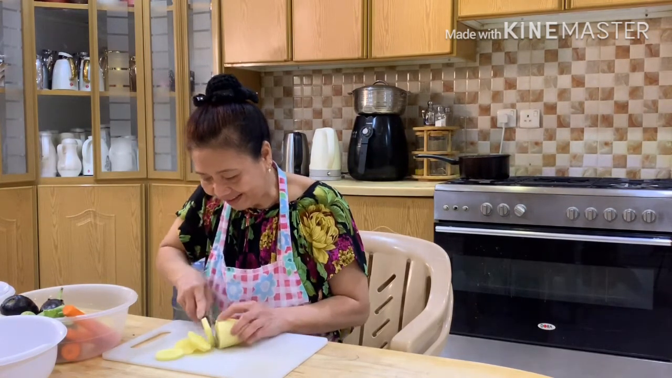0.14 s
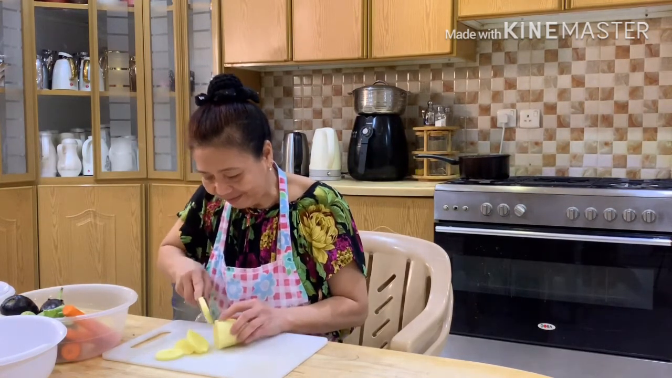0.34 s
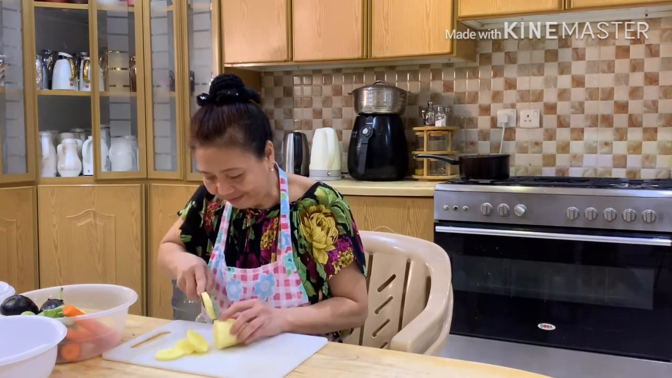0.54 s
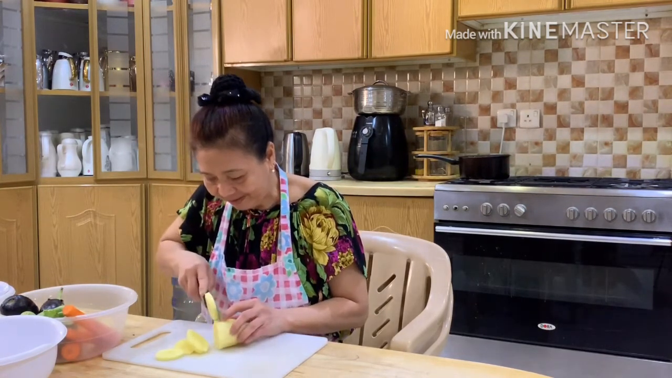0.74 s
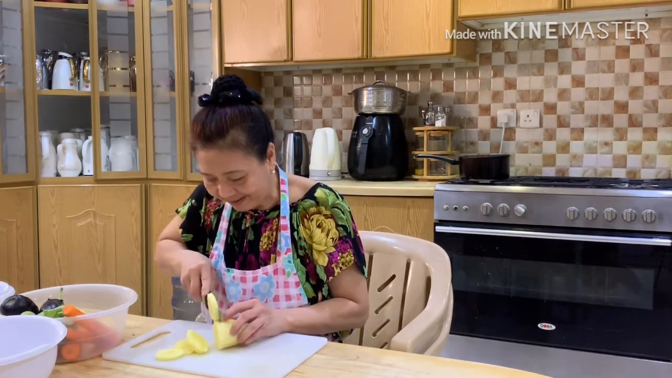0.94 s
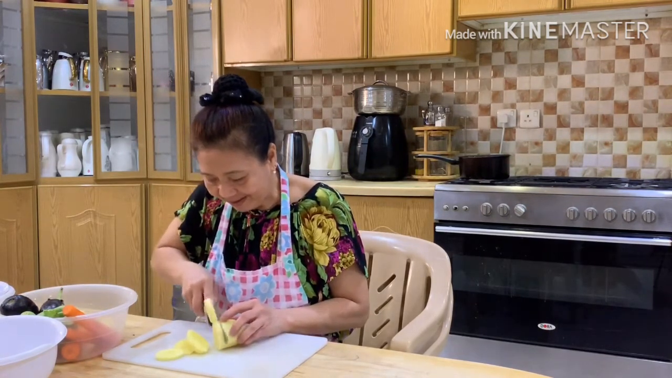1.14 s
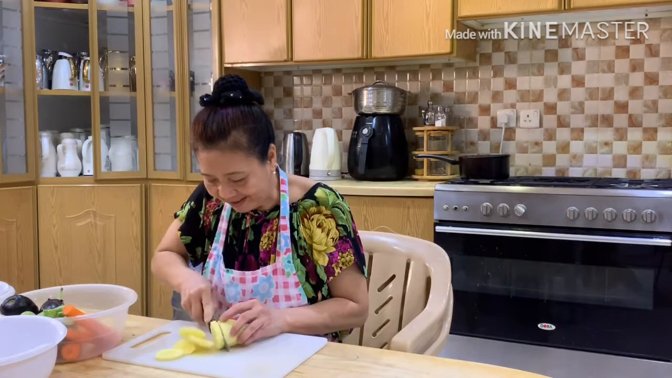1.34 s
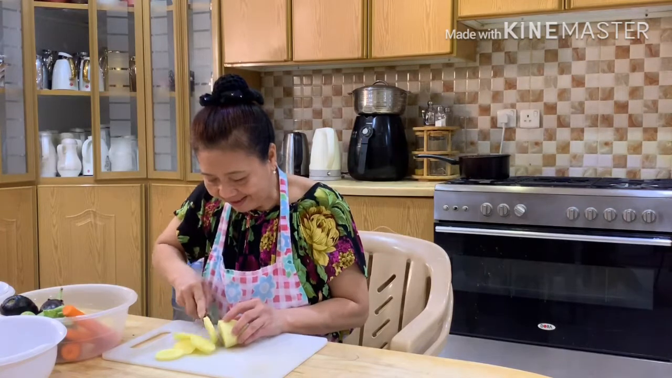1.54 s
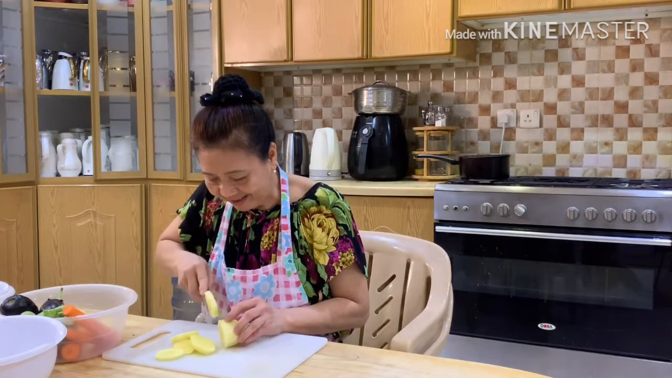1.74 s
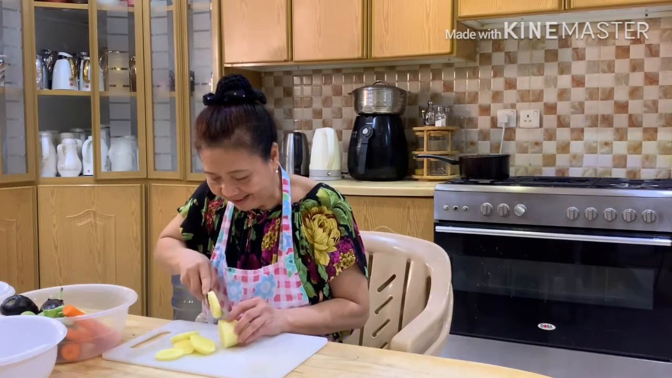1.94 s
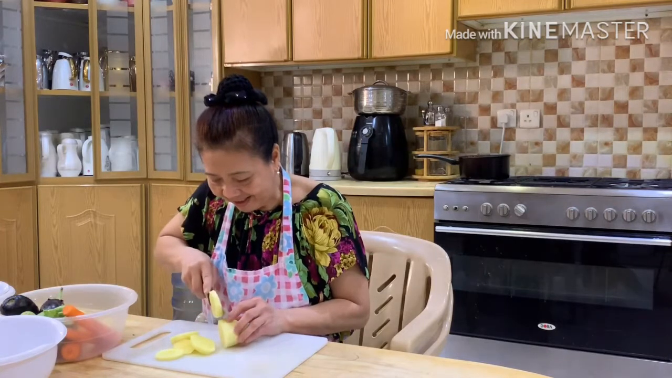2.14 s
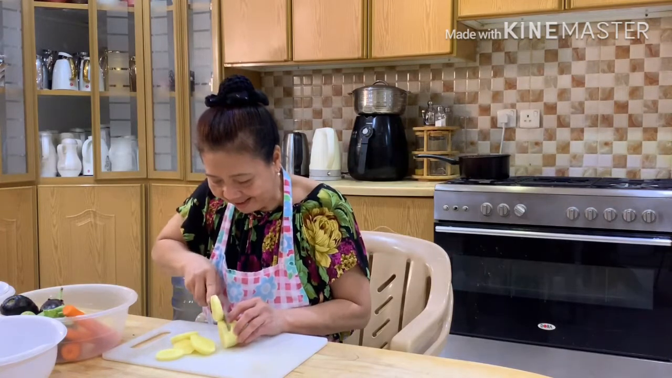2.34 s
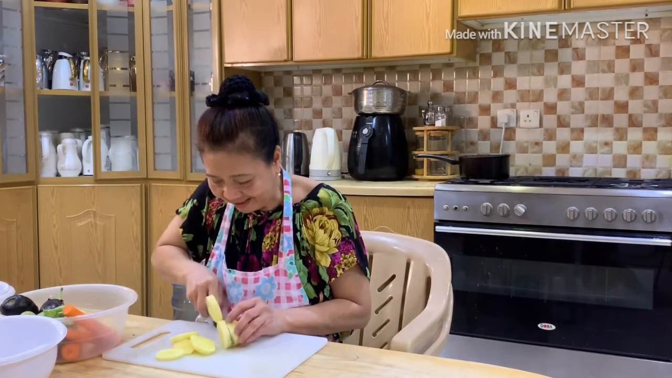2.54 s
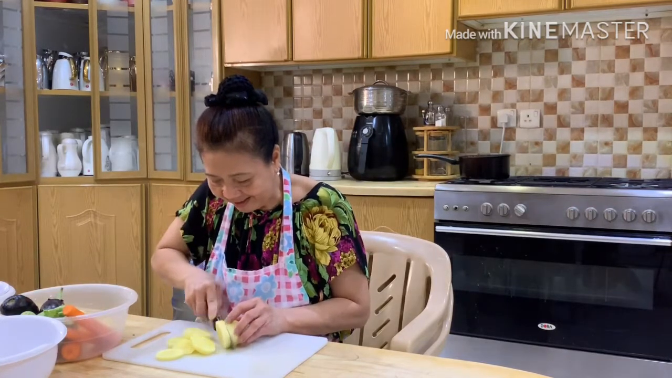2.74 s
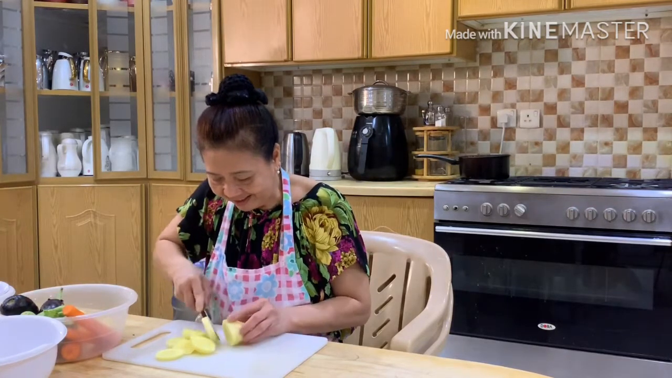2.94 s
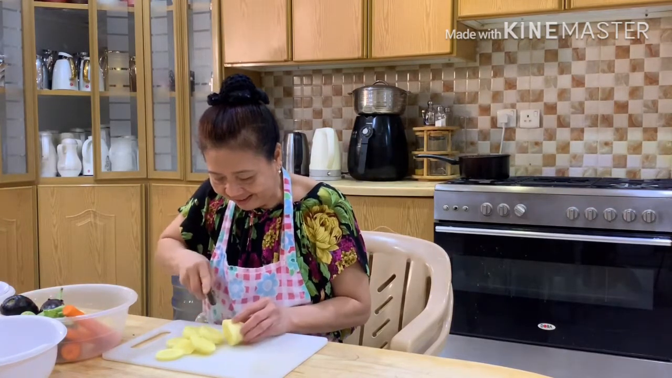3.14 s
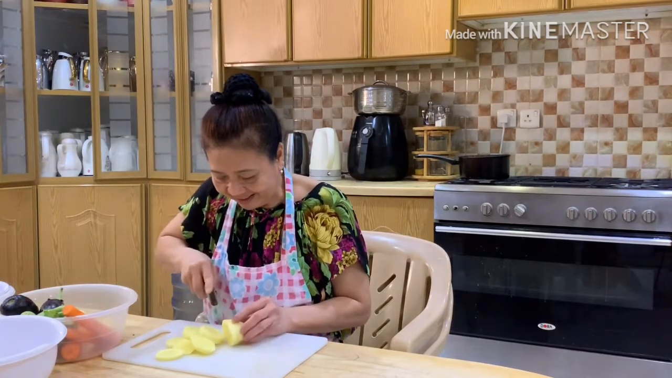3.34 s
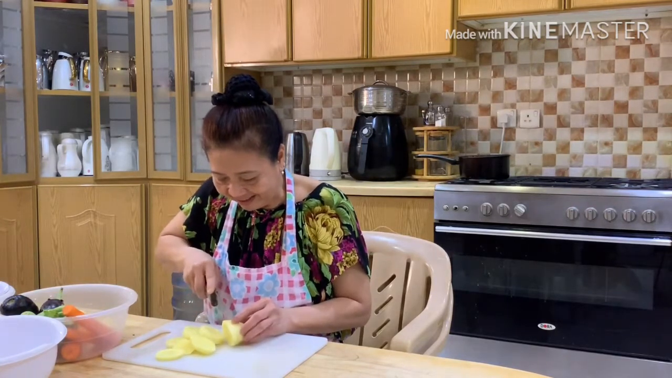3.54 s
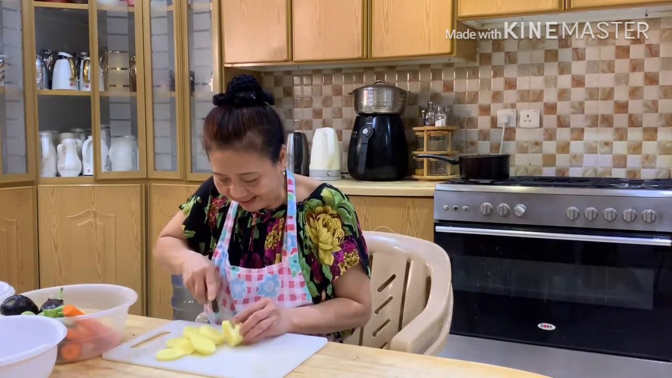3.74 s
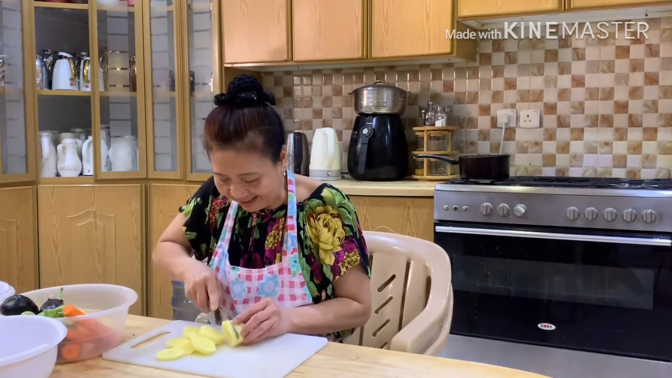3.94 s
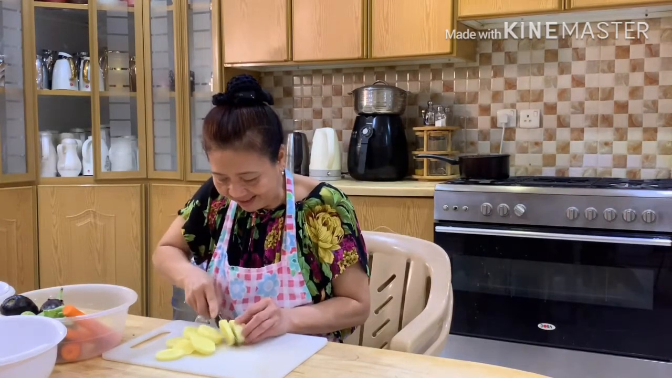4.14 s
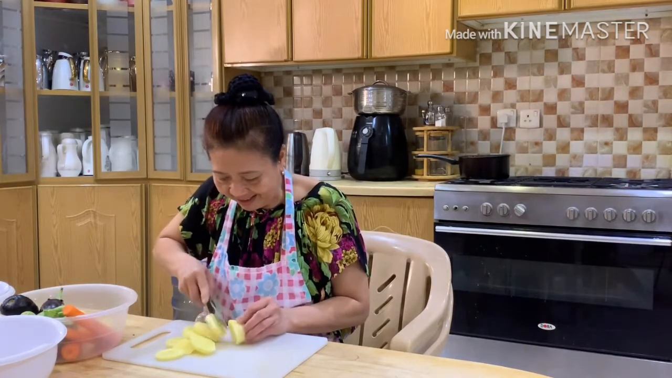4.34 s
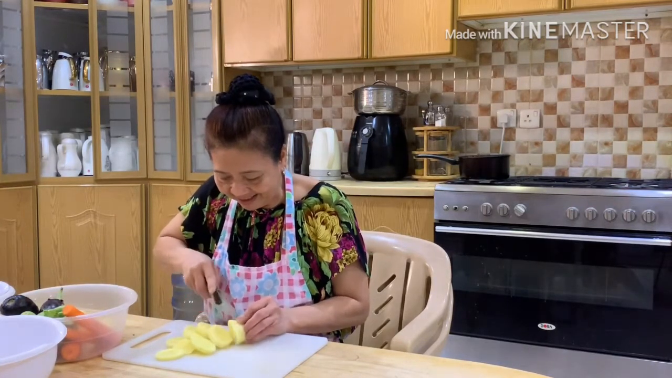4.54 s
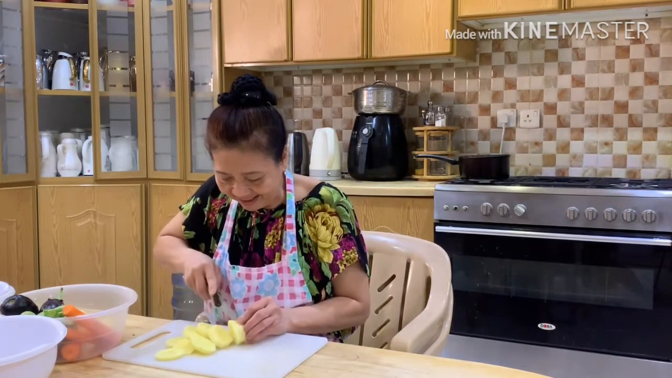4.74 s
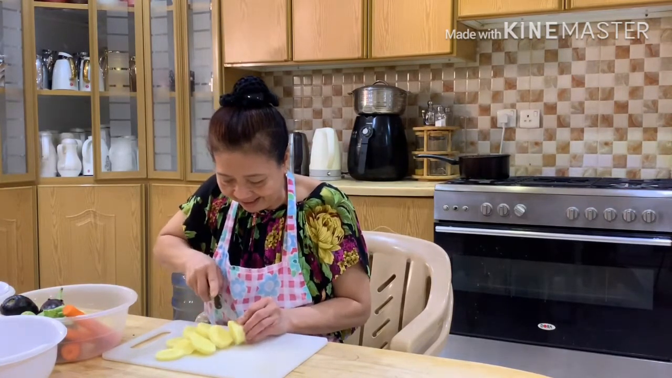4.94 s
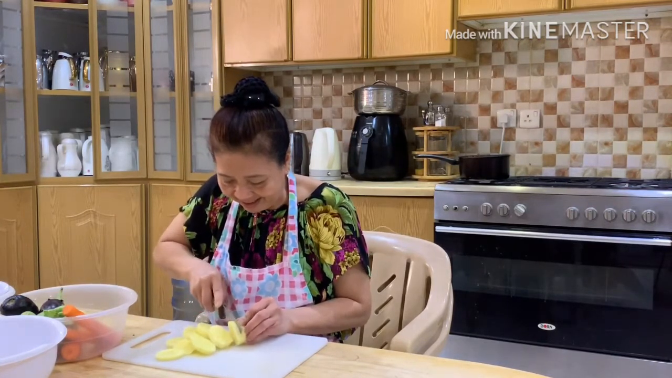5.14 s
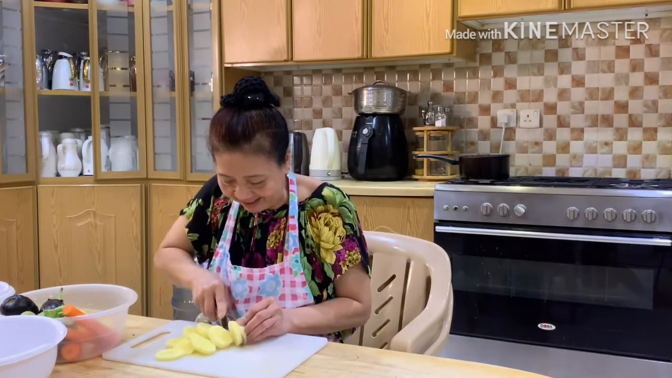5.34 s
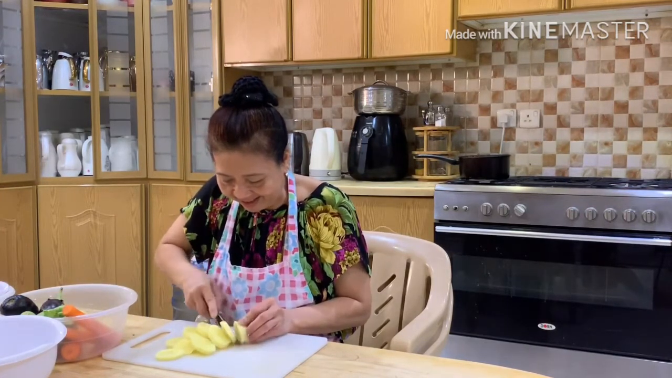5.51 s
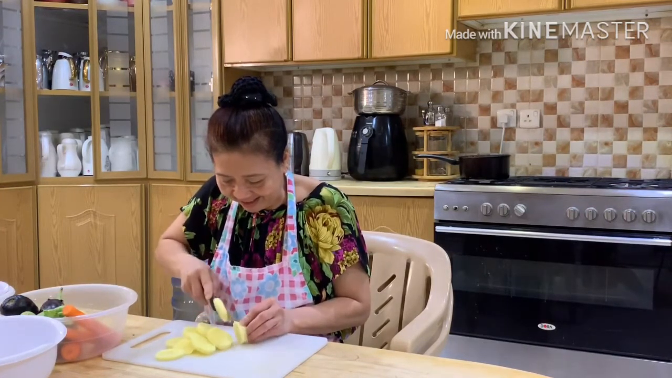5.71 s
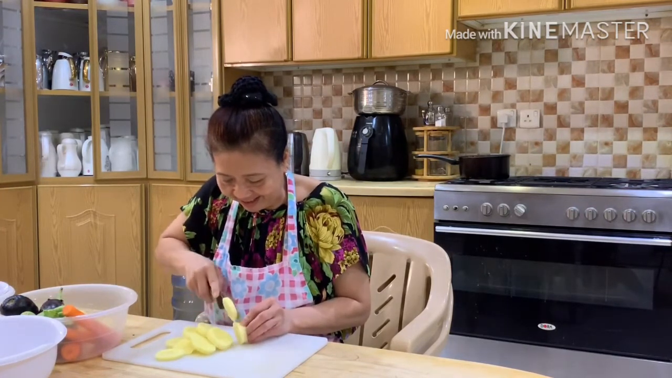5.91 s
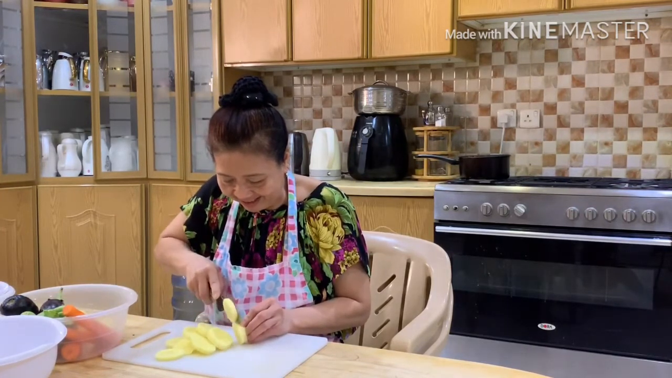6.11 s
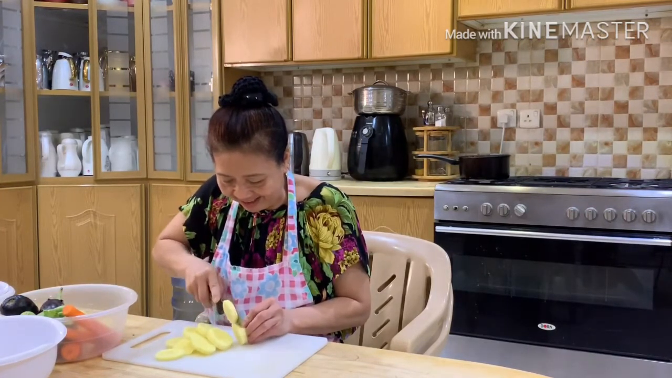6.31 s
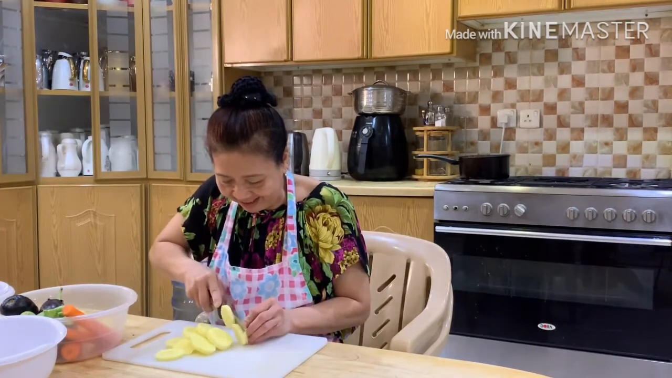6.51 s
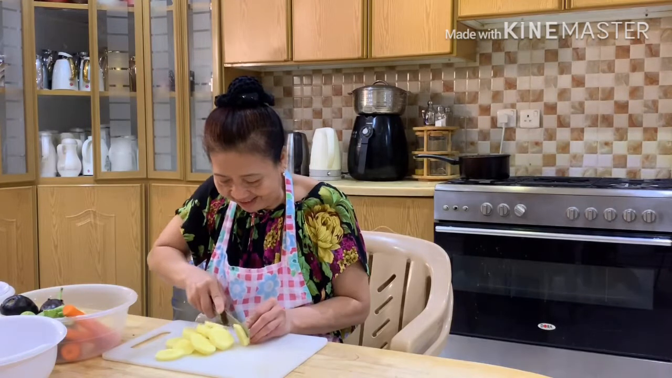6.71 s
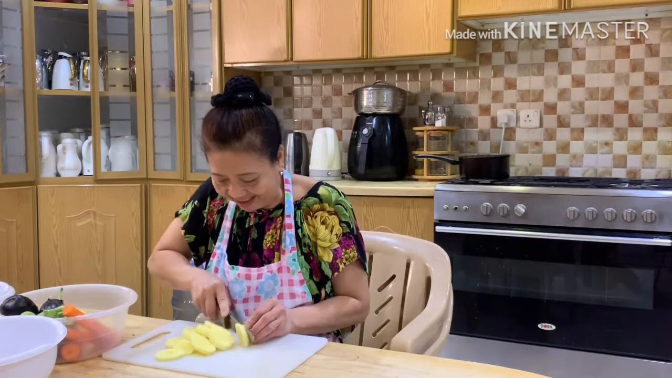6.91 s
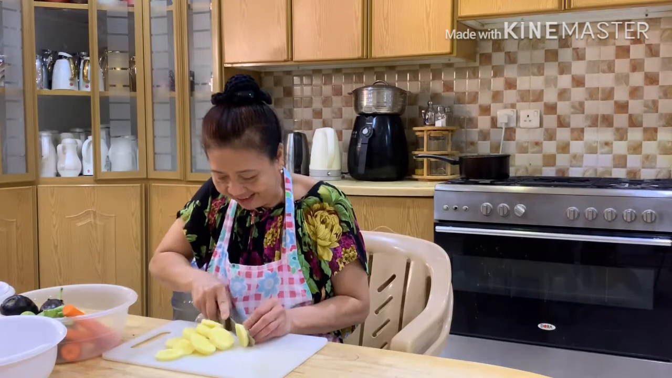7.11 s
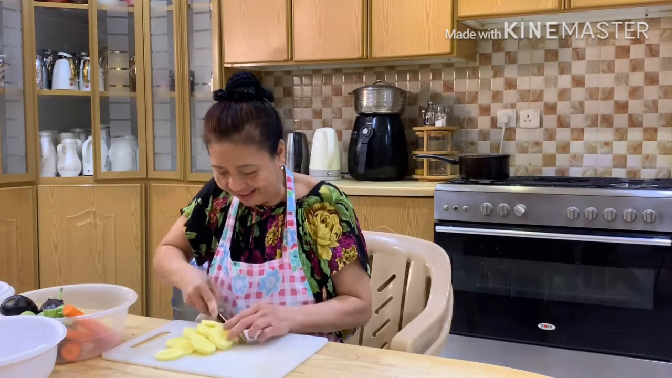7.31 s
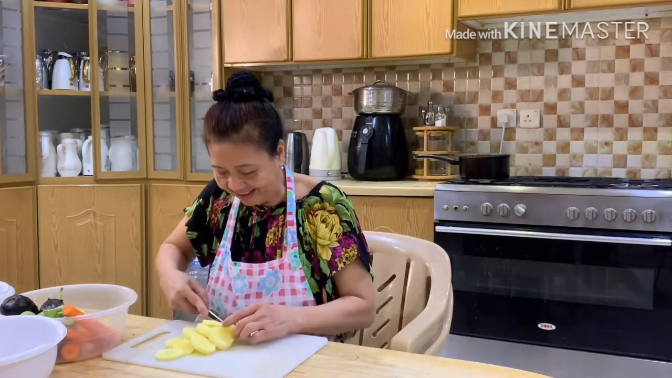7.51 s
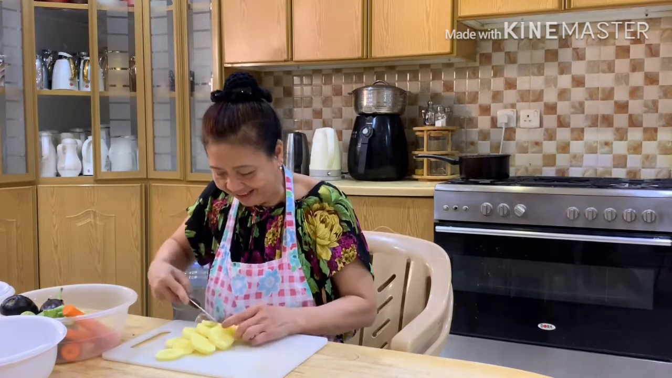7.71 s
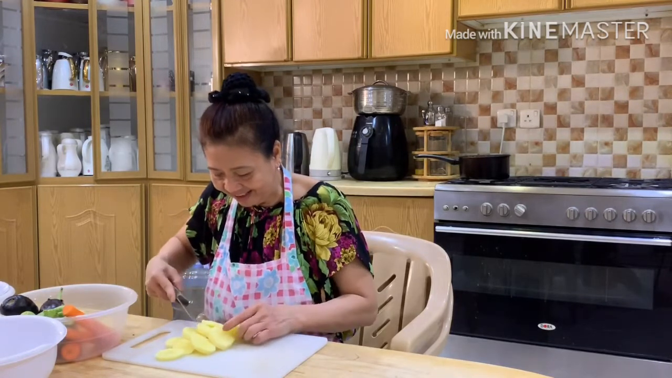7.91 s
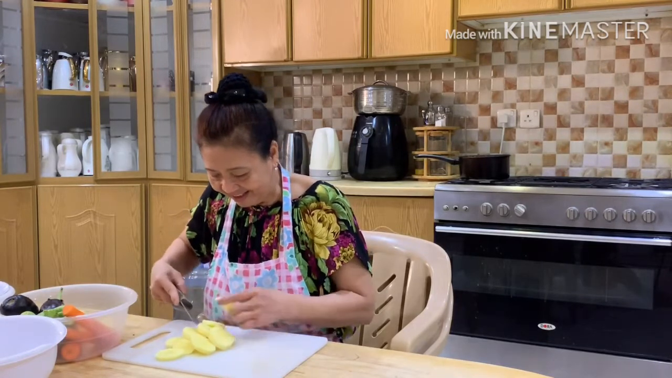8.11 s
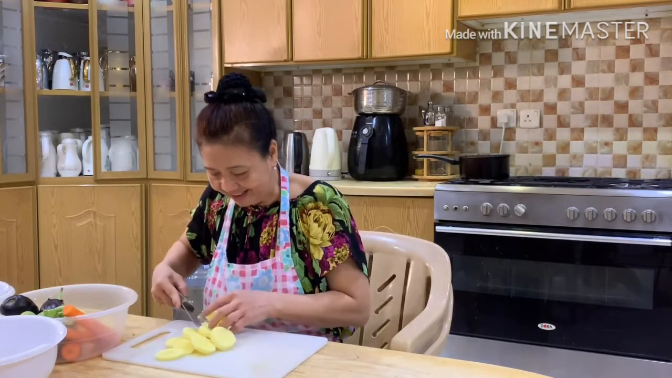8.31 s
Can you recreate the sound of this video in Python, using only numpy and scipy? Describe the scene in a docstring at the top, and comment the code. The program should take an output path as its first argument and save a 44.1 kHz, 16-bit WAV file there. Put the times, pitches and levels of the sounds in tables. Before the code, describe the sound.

A faint steady hum from a distant refrigerator or fan fills a tiled kitchen throughout. The sound opens on the fading echo of a chop and a soft scrape of a knife in raw potato, close and slightly left. From about 1.1 seconds the blade saws through the wet flesh with a quiet hiss and lands on a plastic cutting board at 1.4 seconds with a light knock. The pattern repeats, a few soft, moist strokes leading into each chop, with louder landings at about 2.7, 4.1 and 5.4 seconds, the last two the strongest. Each chop is a sharp tick with a short hollow ring of the board and an echo lasting under a second. Hesitant, gentle sawing from 6.2 seconds leads to a final chop at 7.1 seconds. A tiny wet scrape follows near 7.7 seconds, then only the hum remains until just past 8 seconds.

```python
"""Slicing a potato in a tiled kitchen

A pair of small microphones stands close beside a plastic board on a wooden table, the board a little left.
A knife saws through raw potato: the wet flesh hisses on the blade, then the blade drops onto the board.
Each chop is a tick of the edge, a short hollow ring of the board and a long tail off the hard walls.
Far off, a refrigerator or fan hums."""
import sys
import numpy as np
from scipy import signal
from scipy.fft import rfft, irfft, next_fast_len
from scipy.io import wavfile
from scipy.ndimage import uniform_filter1d

SR = 44100
rng = np.random.default_rng(int(sys.argv[2]) if len(sys.argv) > 2 else 0)


def master_out(mix):
    """Clip the mix to full scale and print it as 16-bit PCM to the path in sys.argv[1]."""
    frames = np.transpose(np.atleast_2d(mix))
    ceiling = np.clip(frames, -1, 1)
    pcm = np.round(ceiling * 32767).astype(np.int16)
    wavfile.write(sys.argv[1], SR, pcm)


N = 368676

# blade landings: t/s, level/dB; relative to that level: hollow ring/dB, edge tick/dB, table thud/dB,
# middle modes/dB, free end/dB, splitting flesh/dB; last, tilt of the tick/(dB per octave)
CHOPS = [(-0.3258, -20.5, 19, -6, 12.5, 3, 3, -51, 9), (1.3659, -19, 11, -17, -4, 1.3, -2, -34, -2),
         (2.7191, -11.5, 7.5, -12.5, -9.5, 1, -5, -31.5, -0.5),
         (4.116, -8.5, 7, -14, -12.5, -3, -8, -32.5, -0.5),
         (5.3955, -8.5, 8, -11.5, -11.5, 2, -4.3, -29.5, -0.5),
         (7.106, -12.5, 11.5, -14.5, -10, 3, -4.5, -33.5, -1.5)]
# the board's hollow ring: f/Hz, level/dB, t60/s
HOLLOW_MODES = [(538, -12, 0.07), (653, -12.5, 0.012), (757.8, 1, 0.034), (806, -3.5, 0.029)]
# the board's free end: f/Hz, level/dB, t60/s
FREE_END_MODES = [(892, 3, 0.054), (1020, 5.5, 0.059), (1096, 5, 0.037)]
# the board's middle modes: f/Hz, level/dB, t60/s
MIDDLE_MODES = [(1267, -4, 0.04), (1240, 0, 0.037), (1494, 1, 0.015), (1865, -4.5, 0.017)]
# the board's upper modes: f/Hz, level/dB, t60/s
UPPER_MODES = [(2180, 0.5, 0.0082), (2264, -7.5, 0.017), (2574, -5, 0.019), (2630, -15.5, 0.0077),
               (2940, -7.5, 0.0098), (3790, -3, 0.0057)]
# the wooden table under it: f/Hz, level/dB, t60/s
TABLE_MODES = [(166, -24.5, 0.93), (241.5, 8.5, 0.043), (315, -0.5, 0.16), (440, -9.5, 0.39),
               (473.3, 1, 0.2)]
# the blade's edge: f/Hz, level/dB, t60/s
EDGE_MODES = [(4300, 2.5, 0.039), (5170, 11, 0.0037), (5940, 1, 0.018), (6730, 6, 0.0041),
              (8280, 0.5, 0.012), (9100, -51, 0.0018), (11700, -2.5, 0.0039), (12400, -34, 0.0062),
              (15900, -2, .003)]
# sawing strokes in the flesh: t/s, length/s, wet hiss/dB, push into the board/dB
STROKES = [(0.0, 0.04, -63, -47.5), (0.123, 0.12, -66, -56), (1.08, 0.039, -65, -52),
           (1.127, 0.1, -58.5, -57.5), (1.218, 0.12, -55.5, -45.5), (1.331, 0.022, -48.5, -48),
           (2.36, 0.067, -63, -52.5), (2.452, 0.086, -57, -54.5), (2.638, 0.099, -54.5, -43.5),
           (3.713, 0.056, -58, -51), (3.884, .05, -60.5, -52), (4.024, 0.14, -57, -48),
           (4.994, 0.044, -69.5, -55), (5.132, 0.024, -60, -47), (5.222, 0.065, -62.5, -54),
           (5.331, 0.036, -54, -44), (6.2, .04, -71, -60), (6.32, 0.023, -67, -79),
           (6.392, 0.041, -71, -65), (6.472, 0.076, -64, -57), (6.653, 0.034, -58, -44.5),
           (6.876, 0.07, -62, -58), (7.73, 0.017, -67, -66)]
# wet flesh on the blade: f/Hz, level/dB
HISS_SPECTRUM = [(1500, -14), (2500, 1.5), (4000, -1.5), (6000, -2), (8500, 0.5), (11500, -10),
                 (13500, -6.5), (15500, 1), (16800, -30)]
# decay of the tiled room: f/Hz, t60/s
ROOM_T60 = [(150, 0.63), (400, 0.71), (1040, 0.8), (2760, 0.82), (7280, 0.67), (11000, 0.29),
            (16000, 0.086)]
# colour of the room tail: f/Hz, level/dB
ROOM_COLOUR = [(150, 4.5), (400, -1), (600, -3), (750, -7.5), (1000, -2.5), (2500, 3.5), (5000, -3),
               (8500, -6), (11000, 14.5), (16000, -11.5)]
# the tail across the microphone pair: f/Hz, left-right correlation
ROOM_LIKENESS = [(60, 0.88), (130, 0.89), (290, 0.91), (640, 0.36), (1410, 0.033), (3100, -0.18),
                 (6820, 0.26), (15000, -0.078)]
# lean of the tail: f/Hz, left over right/dB
ROOM_BALANCE = [(60, -16), (110, 3), (200, -0.5), (380, 1.5), (700, -0.5), (1290, 2.5), (2380, 2.5),
                (4400, -0.5), (8120, -1.5), (15000, 0)]
# broad noise of the distant motor: f/Hz, relative density/dB
MOTOR_SPECTRUM = [(15, -67), (25, -8), (40, -12), (80, -8), (138, -7.5), (172, -2.5), (259, -8.5),
                  (321, -9), (496, -13.5), (1200, -21.5), (2820, -31.5), (3700, -39), (5000, -41),
                  (8800, -49), (11000, -52), (16500, -54)]
# its breathy whines: f/Hz, width/Hz, rms level/dB
MOTOR_WHINES = [(167, 11, -69), (234.6, 5, -60), (2774, 510, -71.5), (2830, 20, -67.5), (4990, 82, -78.5)]
# its hum lines: f/Hz, nominal level/dB
MOTOR_HUM = [(48, -55), (58.5, -52), (177.6, -50.5), (323, -48.5), (382, -57.5)]
# sound from all round at the microphone pair: f/Hz, left-right correlation
DIFFUSE_LIKENESS = [(60, 0.95), (130, 0.94), (290, 0.86), (640, 0.31), (1410, -0.21), (3100, -0.29),
                    (6820, 0.13), (15000, -0.23)]

LEAD_IN = SR // 2   # samples before t = 0, so the scene opens in the tail of a chop
PAN_DB, LEFT_LEAD_SAMPLES = 2.5, 4   # the left microphone is nearer the board
TICK_LEAD_S = .0004   # the edge ticks before the board takes the load
HISS_RISE_S, PUSH_RISE_S = 0.013, 0.038
HISS_FADE_S, PUSH_FADE_S = 0.038, 0.015   # time constants after a stroke stops
CATCH_DB, CATCH_HZ = 1.5, 40   # the blade catches and slips within a stroke
ROOM_DB, ROOM_ONSET_S = -0.5, 0.019
MOTOR_NOISE_DB, CUTOFF_HZ = -46, 16990


def chop(level_db, hollow_db, tick_db, thud_db, middle_db, end_db, split_db, tick_tilt):
    """One landing rings blade, board and table; returns the sound and its lead in samples."""
    lead, size = SR // 50, SR // 4
    t = (np.arange(size) - lead) / SR - .001   # zero when the full edge is down
    # one sharp contact, and smaller ones as the edge beds in along its length
    from_tick = np.abs(t + TICK_LEAD_S)
    contact = .07 * rng.standard_normal(size) * np.exp(-from_tick / .0005)
    contact[np.argmin(from_tick)] = 1
    # the last flesh splits with a swelling crackle just before the blade lands
    split = amp(split_db) * rng.standard_normal(size) * np.exp(np.minimum(t, 0) / 0.0057) * (t < 0)
    # the hand keeps pressing for a few ms, so the low modes swell before they die
    pressed_s = np.maximum(t, 0)
    press = pressed_s ** 2 * np.exp(-pressed_s / .0008)
    out = 0
    for modes, group_db in ((HOLLOW_MODES, hollow_db), (FREE_END_MODES, end_db), (TABLE_MODES, thud_db)):
        for hz, db, t60 in modes:
            drive = 2 * press * np.cos(2 * np.pi * hz * t) / press.sum()
            gain = amp(group_db + db + rng.normal(0, 0.96))
            out += gain * ring(drive + 0.24 * split, hz, t60)
    struck = ((MIDDLE_MODES, middle_db, 0), (UPPER_MODES, 1.5, 0), (EDGE_MODES, tick_db, tick_tilt))
    for modes, group_db, tilt in struck:
        for k, (hz, db, t60) in enumerate(modes):
            octaves_up = np.log2(min(hz, 8000) / modes[0][0])
            gain = amp(group_db + db + tilt * octaves_up + rng.normal(0, 1.0))
            out += (-1) ** k * gain * ring(contact + split, hz, t60)
    out = butterworth(out, 6, 165, "high")   # a small board radiates no deep bass
    return amp(level_db) * out, lead


def chopping():
    """Every landing of the blade, as it reaches the microphones and as it spreads into the room."""
    direct, spread = np.zeros((2, LEAD_IN + N + SR))
    for time_s, *settings in CHOPS:
        blow, lead = chop(*settings)
        at = LEAD_IN + round(time_s * SR)
        direct[at - lead:at - lead + len(blow)] += blow
        spread[at:at + len(blow)] += all_round(blow, octaves=0.23)
    return direct[:LEAD_IN + N], spread[:LEAD_IN + N]


def slicing():
    """Cells burst densely along the blade; the sawing push also rumbles in the board's modes."""
    size = LEAD_IN + N
    t = (np.arange(size) - LEAD_IN) / SR
    *_, hiss_db, push_db = np.transpose(STROKES)
    bursts = (rng.random(size) < 1500 / SR) * rng.exponential(1, size)
    sizzle = 1 + .3 * signal.lfilter([1], [1, -.98], bursts)   # dense pops blur together
    catch = rms_one(butterworth(rng.standard_normal(size), 2, CATCH_HZ, "low"))
    hiss = rms_one(amp(CATCH_DB * catch) * sizzle * coloured(HISS_SPECTRUM, size))
    rub = rng.standard_normal(size)
    push = rms_one(sum(amp(db) * ring(rub, hz, t60) for hz, db, t60 in HOLLOW_MODES))
    hiss *= stroke_gain(t, hiss_db, HISS_RISE_S, HISS_FADE_S)
    push *= stroke_gain(t, push_db, PUSH_RISE_S, PUSH_FADE_S)
    return hiss, push


def stroke_gain(t, levels_db, rise_s, fade_s):
    """Every stroke rises, holds and dies away; overlapping strokes add in power."""
    power = 0
    for (start, length, *_), db in zip(STROKES, levels_db):
        rise = np.clip((t - start) / rise_s, 0, 1)
        fade = np.exp(-np.maximum(t - start - length, 0) / fade_s)
        power += (amp(db) * rise * fade) ** 2
    return np.sqrt(power)


def all_round(blow, octaves):
    """A blow as the walls get it, averaged over all directions: a short pulse, its spectrum smoothed."""
    size = 16384
    hz, log_grid = np.fft.rfftfreq(size, 1 / SR), np.geomspace(20, SR / 2, num=1000)
    power = np.interp(log_grid, hz, np.abs(rfft(blow, size)) ** 2)
    smooth = np.interp(hz, log_grid, uniform_filter1d(power, size=max(int(100 * octaves), 1)))
    cepstrum = irfft(np.log(smooth + 1e-12) / 2)
    cepstrum[1:size // 2] *= 2   # folding onto positive times gives the shortest pulse
    cepstrum[size // 2:] = 0
    return irfft(np.exp(rfft(cepstrum)))[:len(blow)]


def kitchen(sent):
    """Dense reflections off the tiles build up quickly round the microphones and die band by band."""
    size = SR + SR // 4
    t = np.arange(size) / SR
    response = 0
    for centre in 100 * 2 ** np.arange(0, 7.6, .5):
        def octave_band(hz):
            return np.cos(np.pi * np.clip(np.log2(np.maximum(hz, 1) / centre), -.5, .5))
        band = diffuse(octave_band, size, ROOM_LIKENESS)
        band *= amp(at_hz(ROOM_BALANCE, centre) / 2 * np.array([[1], [-1]]))
        # table top and bowls are small and near: they throw back the treble at once
        nearby = amp(10.5) * min(centre / 3000, 1) ** 2 * np.exp(-t / 0.0054) * (t > .002)
        build_up = 1 - np.exp(-(t / ROOM_ONSET_S) ** 2)
        decay = amp(at_hz(ROOM_COLOUR, centre) - 60 * t / at_hz(ROOM_T60, centre))
        response += (build_up + nearby) * decay * band
    response /= np.sqrt(np.sum(response ** 2) / 2)
    return signal.fftconvolve(sent[None], response, axes=1)[:, :len(sent)]


def motor():
    """A far-off refrigerator or fan fills the room with broad noise, breathy whines and hum."""
    out = amp(MOTOR_NOISE_DB) * rms_one(diffuse(lambda hz: amp(at_hz(MOTOR_SPECTRUM, hz)), N))
    for line_hz, width_hz, db in MOTOR_WHINES:
        whine = diffuse(lambda hz: 1 / (1 + (2 * (hz - line_hz) / width_hz) ** 2), N)
        out += amp(db) * rms_one(whine)
    for line_hz, db in MOTOR_HUM:
        wander = rms_one(diffuse(lambda hz: 1 / (1 + (hz / 4.1) ** 2), N))   # speed and load drift
        phase = 2 * np.pi * (line_hz * np.arange(N) / SR + rng.random()) + 0.68 * wander[0]
        out += amp(db - 1.0 + 4.0 * (wander[0] - wander[1])) * np.sin(phase)
    return out


def diffuse(shape, size, likeness=DIFFUSE_LIKENESS):
    """Noise from all round, alike at both microphones in the bass; shape(hz) is its gain."""
    fast = next_fast_len(size)
    hz = np.fft.rfftfreq(fast, 1 / SR)
    mid, side = rfft(rng.standard_normal((2, fast)), axis=1)
    alike = np.clip(at_hz(likeness, hz), -.99, .99)
    pair = np.sqrt(1 + alike) * mid + np.sqrt(1 - alike) * side * [[1], [-1]]
    return irfft(shape(hz) * pair, fast, axis=1)[:, :size]


def coloured(spectrum, size):
    """Noise with a given spectrum, at unit rms."""
    gain = amp(at_hz(spectrum, np.fft.rfftfreq(size, 1 / SR)))
    return rms_one(irfft(rfft(rng.standard_normal(size)) * gain, size))


def ring(drive, hz, t60):
    """One damped mode: a unit click starts a dying sine of height 1."""
    radius, angle = amp(-60 / (t60 * SR)), 2 * np.pi * hz / SR
    return signal.lfilter([0, np.sin(angle)], [1, -2 * radius * np.cos(angle), radius ** 2], drive + 1e-18)


def butterworth(x, order, hz, kind):
    """Low-pass or high-pass filter."""
    return signal.sosfilt(signal.butter(order, hz, kind, fs=SR, output="sos"), x)


def at_hz(points, hz):
    """Read a table on a log-frequency axis."""
    table_hz, values = np.transpose(points)
    return np.interp(np.log(np.maximum(hz, 1)), np.log(table_hz), values)


def amp(db):
    """dB to gain."""
    return 10 ** (np.asarray(db, float) / 20)


def rms_one(x):
    """Scale to unit rms."""
    return x / np.sqrt(np.mean(x ** 2) + 1e-20)


def scene():
    """Board and blade close by on the left, their echo and the distant motor all round."""
    hiss, push = slicing()
    blows, spread = chopping()
    near = blows + push + hiss
    direct = np.array([near * amp(PAN_DB / 2), np.roll(near, LEFT_LEAD_SAMPLES) * amp(-PAN_DB / 2)])
    echo = amp(ROOM_DB) * kitchen(spread + push + amp(-7) * hiss)
    return (direct + echo)[:, LEAD_IN:] + motor()


def record(dry):
    """After the microphones: the highest peaks are rounded, the deep bass rolled off, the top cut."""
    rounded = dry / (1 + dry ** 6) ** (1 / 6)
    low_cut = butterworth(rounded, 2, 22, "high")
    return signal.sosfilt(signal.cheby2(12, 70, CUTOFF_HZ, fs=SR, output="sos"), low_cut)


dry = scene()
out = record(dry)
master_out(out)
```